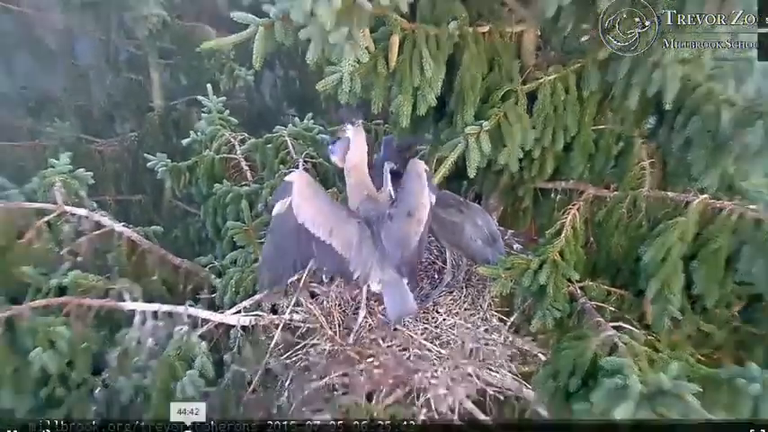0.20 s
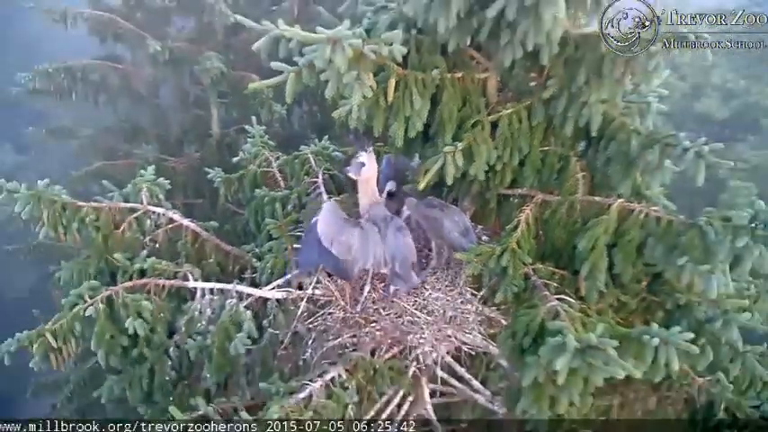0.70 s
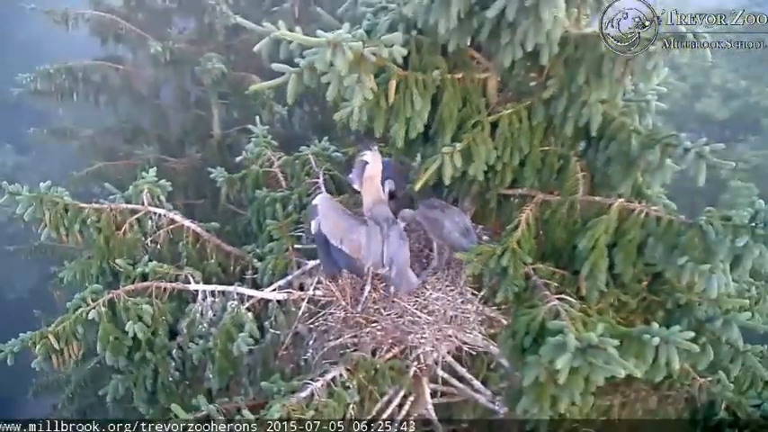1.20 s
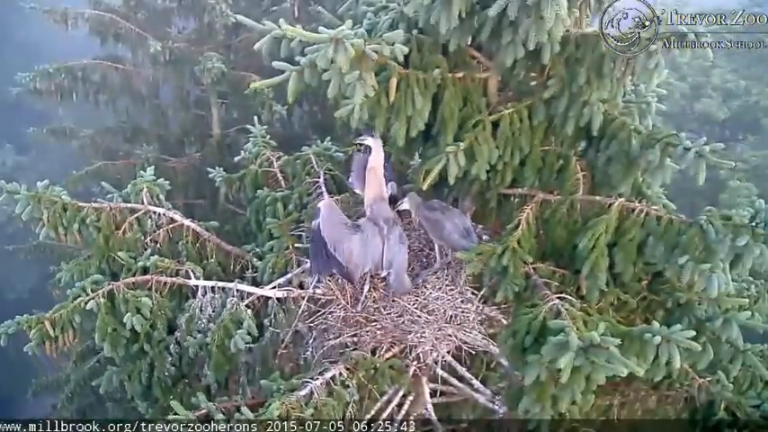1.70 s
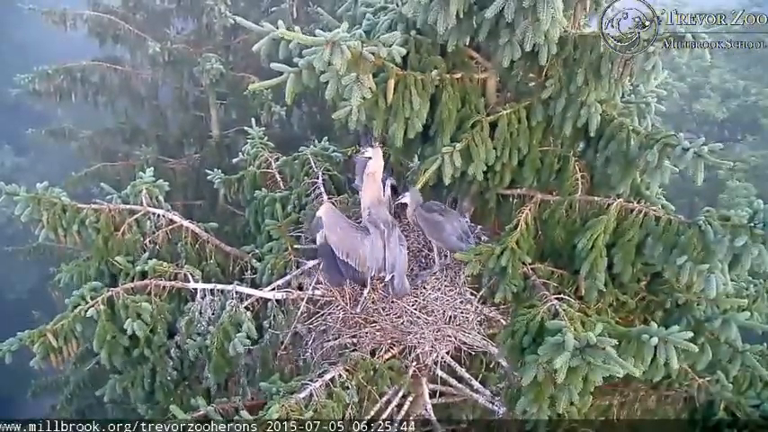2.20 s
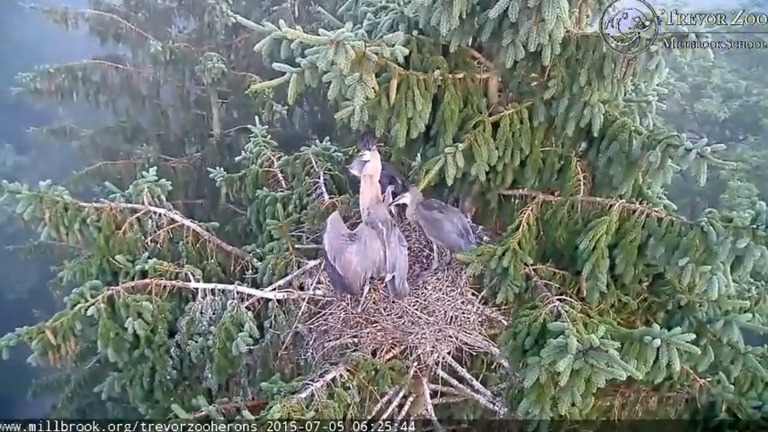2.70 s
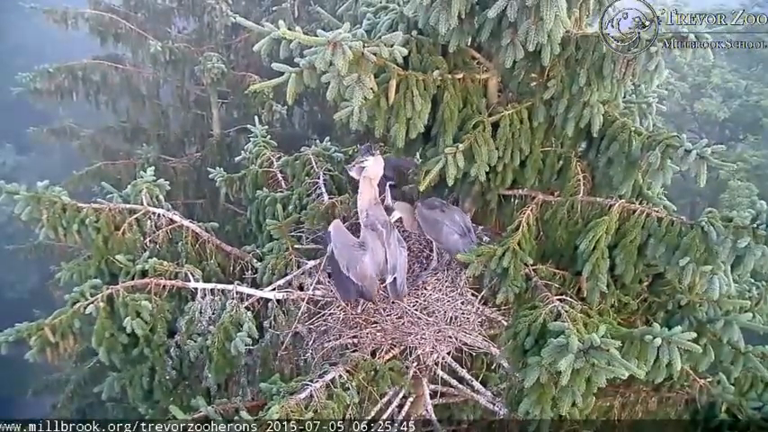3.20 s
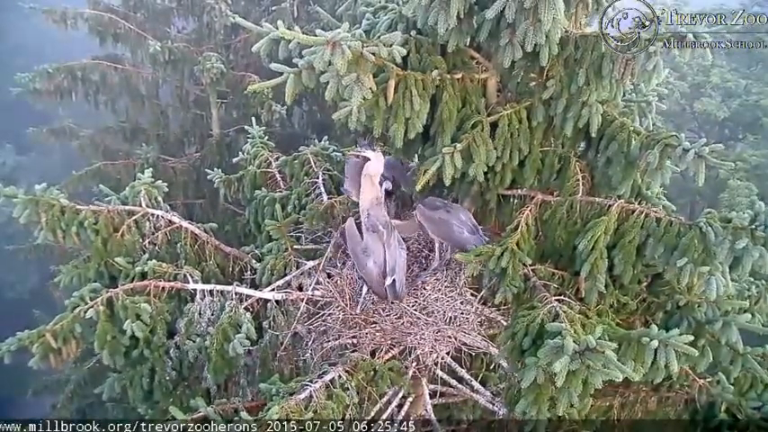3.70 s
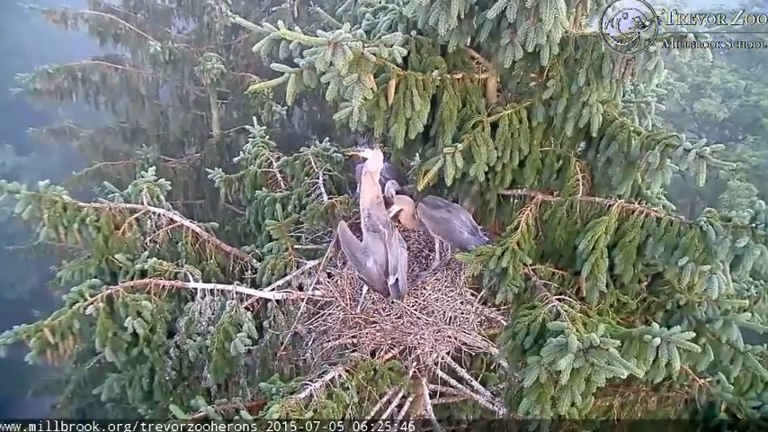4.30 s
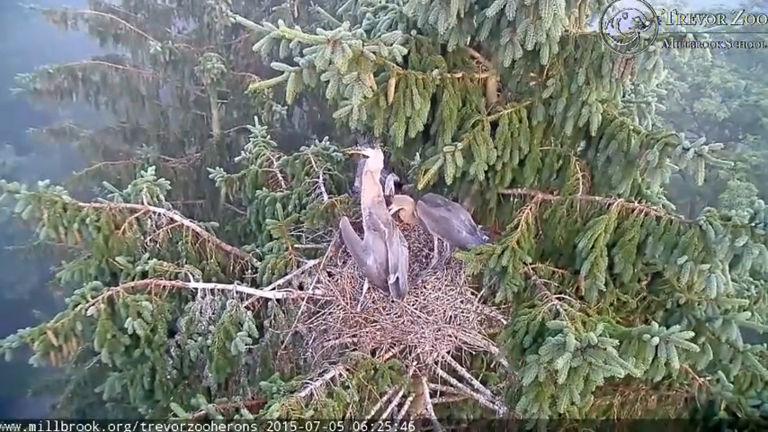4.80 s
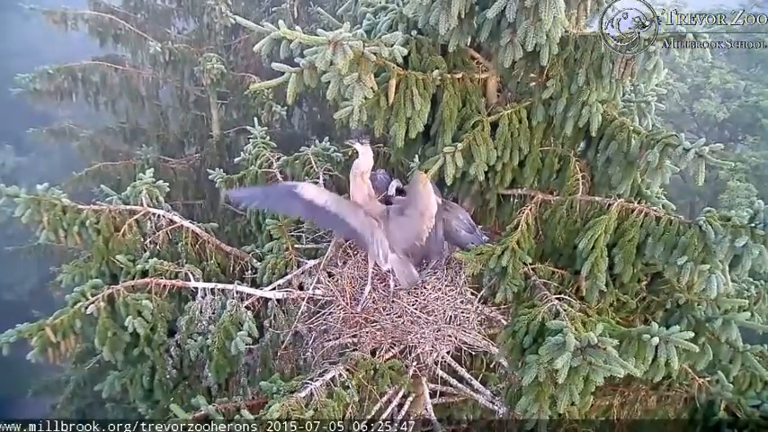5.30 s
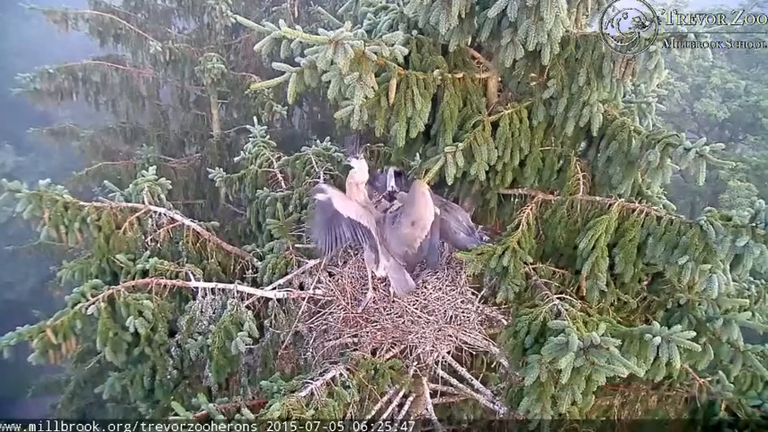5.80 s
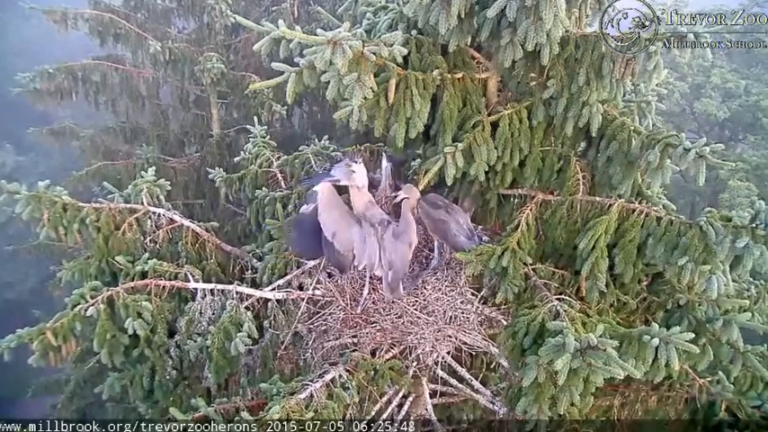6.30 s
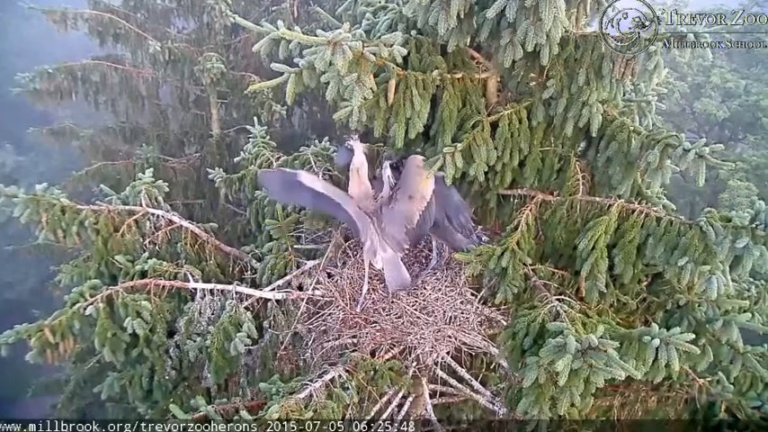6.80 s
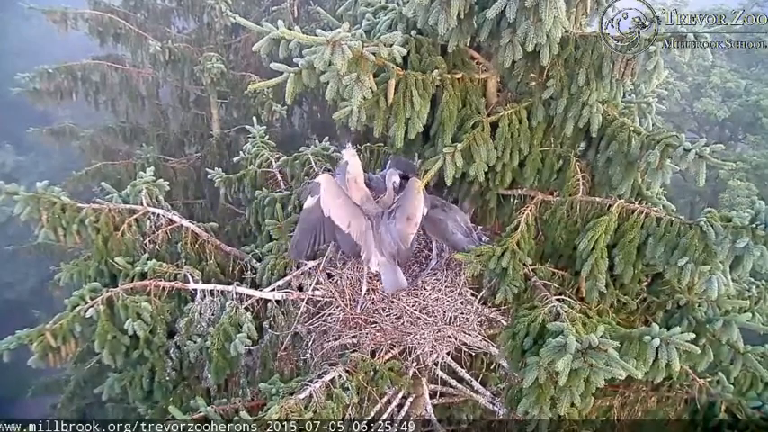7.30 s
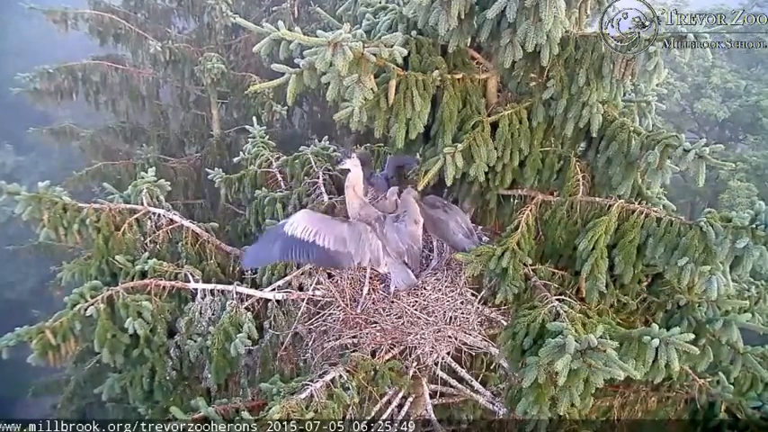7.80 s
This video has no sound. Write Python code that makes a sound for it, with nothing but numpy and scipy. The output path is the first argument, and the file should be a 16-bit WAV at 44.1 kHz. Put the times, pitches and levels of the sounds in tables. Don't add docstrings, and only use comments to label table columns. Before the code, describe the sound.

From 0 s, young herons on a treetop stick nest give harsh, throaty begging clacks, each a burst of rapid pulses about a tenth of a second long, hollow and nasal with a bright edge. After a few scattered calls, from 0.6 s they run in a steady train, about seven a second, strongest near 1.3-1.7 s. Feet thump dully, twigs tick and needles rustle. At 2.7 s the clacks stop; hoarse sibling rasping and soft woodland air remain, with a faint falling songbird whistle around 3.2 s. The second bout runs from 3.75 to about 6.1 s, with clear glides and low groans, peaking near 5 s. After a thin gap, the third starts at 6.6 s with the loudest, abrupt clack, under a far high peep, and continues strongly to 8 s. Short tree echo, low hum, microphone hiss, faint high whine and clipped-off gaps throughout.

```python
import sys
import numpy as np
from scipy import signal
from scipy.fft import rfft, irfft, next_fast_len
from scipy.io import wavfile
from scipy.ndimage import uniform_filter1d, minimum_filter1d, map_coordinates

SR = 44100
rng = np.random.default_rng(int(sys.argv[2]) if len(sys.argv) > 2 else 0)


def transcribe(u):
    v = np.clip(np.atleast_2d(u).T, -1, 1)
    q = np.round(v * 32767).astype(np.int16)
    wavfile.write(sys.argv[1], SR, q)


def rack_gain(trim_db):
    fader = np.asarray(trim_db, float)
    return 10 ** (fader / 20)


N = 356328


def unit(x):
    return x / np.sqrt(np.mean(x ** 2) + 1e-20)


def along(points, hz):
    f, v = np.transpose(points)
    return np.interp(np.log(hz + 1), np.log(f + 1), v)


def at(s, rows):
    return np.interp(s, *np.transpose(rows))


def curves(rows):
    s, *cols = np.transpose(rows)
    return [np.interp(np.arange(N) / SR, s, c) for c in cols]


def wobble(rate):
    knots = rng.standard_normal(int(N * rate / SR) + 4)
    return map_coordinates(knots, [np.arange(N) * rate / SR])


def noise(spectrum):
    m = next_fast_len(N)
    white = rfft(rng.standard_normal(m))
    return unit(irfft(white * rack_gain(along(spectrum, np.fft.rfftfreq(m, 1 / SR))), m)[:N])


def sine(hz):
    return np.sin(2 * np.pi * np.cumsum(hz) / SR)


def add(track, s, x):
    part = track[max(round(s * SR), 0):][:len(x)]
    part += x[:len(part)]


def resonances(modes, f):
    def one(c, w):
        return 1j * f * w / (c * c - f * f + 1j * f * w)
    return sum((-1) ** k * rack_gain(db) * one(c, w) * one(c, 3 * w) for k, (c, w, db) in enumerate(sorted(modes)))


# pitch in Hz, width in Hz, level in dB.
STILL_THROAT = [(498, 118, -18.5), (1277, 600, -23.5), (4070, 760, -16.5), (5270, 490, -27.5)]
# time in seconds, chest resonance in Hz (the neck stretches),
# bill resonance in dB (the head turns to the microphone), windpipe tone in dB.
POSE = [(0, 1030, -0.5, -28), (.07, 980, -14, -23), (.26, 950, -30, -25), (.36, 990, -8, -24),
        (.6, 1100, 0, -17), (.73, 1066, 2.5, -16), (.87, 1000, -1, -17), (1.0, 950, -4, -10.5),
        (1.17, 944, -6, -16), (1.31, 984, -2, -17), (1.45, 1010, -2, -18.5), (1.6, 1034, -1.5, -18.5),
        (1.75, 936, -1, -15.5), (1.9, 940, -5.5, -13), (2.07, 875, -4.5, -15), (2.24, 870, -13, -17),
        (2.38, 774, -1, -13), (2.44, 790, -12, -14), (2.54, 765, -2, -11), (2.61, 1080, -20, -10.5),
        (3.75, 854, 1, -29), (3.9, 865, 4, -27), (4.06, 850, 1.5, -30), (4.22, 760, 2, -15),
        (4.38, 810, -3, -21), (4.52, 870, -2, -15), (4.7, 805, -0.5, -15), (4.83, 780, -3, -14),
        (4.99, 800, -5, -11.5), (5.11, 764, -7.5, -10), (5.28, 775, -4.5, -17.5), (5.46, 780, -1.5, -3.5),
        (5.52, 830, 2.5, -19), (5.65, 825, -2.5, -4), (5.89, 790, -3.5, -20), (6.04, 800, -10, -9),
        (6.25, 870, -7, -28), (6.35, 930, -10.5, -40), (6.55, 895, -5, -38), (6.62, 830, -4, -31),
        (6.66, 925, -7.5, -15.5), (6.75, 850, -17, -17.5), (6.9, 850, -2.5, -39), (7.03, 935, -2.5, -21),
        (7.2, 875, 2.5, -20), (7.35, 1000, -5, -22), (7.5, 1016, -7, -15), (7.66, 975, -5, -18),
        (7.8, 954, -5.5, -14.5), (7.95, 1010, -3.5, -26)]
# time in seconds, leak from 0 up.
LEAK = [(0, .15), (.55, .35), (1.0, .4), (1.17, .5), (1.45, .25), (1.6, .4), (2.24, .3), (2.44, .7),
        (2.54, .3), (2.61, .9), (3.9, .25), (4.06, .03), (4.7, .1), (4.83, .3), (4.99, .1), (5.11, .3),
        (5.28, .15), (5.46, .1), (5.52, .5), (5.65, .15), (5.9, .2), (6.05, .03), (6.35, 1.2), (6.66, .1),
        (6.75, .6), (7.05, .5), (7.2, .04), (7.36, .6), (7.5, .8), (7.66, .1), (7.8, .05)]
# time in seconds, pitch in Hz.
BILL = [(0, 3480), (.36, 3300), (.6, 3420), (.75, 3530), (.87, 3490), (1.0, 3520), (1.2, 3670),
        (1.31, 3540), (1.45, 3550), (1.6, 3520), (1.75, 3590), (1.95, 3800), (2.07, 3700), (2.24, 3600),
        (2.4, 3400), (2.54, 3330), (3.75, 3500), (3.9, 3570), (4.06, 3400), (4.22, 3520), (4.38, 3650),
        (4.52, 3660), (4.7, 3760), (4.83, 3777), (4.99, 3730), (5.11, 3600), (5.28, 3500), (5.46, 3370),
        (5.52, 3450), (5.65, 3520), (5.89, 3380), (6.35, 3440), (6.66, 3280), (6.9, 3640), (7.03, 3420),
        (7.2, 3510), (7.35, 3540), (7.5, 3480), (7.66, 3520), (7.8, 3500), (7.95, 3560)]
# time in seconds, treble in dB.
AIM = [(0, -7), (.25, -8), (.6, 2), (.73, 4), (.87, 3.5), (1.0, 0), (1.17, 3), (1.31, 1), (1.45, -3),
       (1.6, -4), (1.75, 1), (1.9, -2), (2.07, -1), (2.24, -4), (2.38, 2), (2.54, -3), (3.75, -3),
       (3.9, -1), (4.06, -2), (4.22, -6), (4.38, 1), (4.52, 3.5), (4.7, 4.5), (4.83, 7), (4.99, 0),
       (5.11, 0), (5.28, -1), (5.46, 0), (5.52, -2), (5.65, 3.5), (5.89, -3), (6.35, -12), (6.66, 3.5),
       (6.9, -3), (7.03, -1), (7.2, -2), (7.35, 3), (7.5, 0), (7.66, 0), (7.8, -1.5), (7.95, -1)]


def voicing(s, db, rise, gape_hz, aside):
    usual_db, usual_gape_hz = -25, 2550
    times, *pose = np.transpose(POSE)
    chest_hz, bill_db, neck_db = (np.interp(s, times, column) for column in pose)
    effort_db = db - usual_db
    frenzy = np.exp(-((s - .65) / .3) ** 2)
    snap = np.exp(-rise / 0.0035)

    fall = max(205 + 6.5 * effort_db + 3 * s, 60) * (1 - 0.46 * frenzy)
    leak = at(s, LEAK) + 0.42 * frenzy
    flutter_hz, click_share = 200 + 170 * frenzy, .55 + .4 * frenzy

    chest_db = -8 - 0.25 * effort_db - 0.03 * (chest_hz - 900) - 10 * aside - 1.5 * snap
    edge_db = -47 - 0.4 * effort_db + 0.09 * bill_db - 35 * aside + 14.5 * snap - 4 * frenzy + at(s, AIM)
    bill_hz = at(s, BILL) + 0.16 * (gape_hz - usual_gape_hz)
    throat = [(chest_hz + 206 * snap, 300, chest_db),
              (0.711 * gape_hz, 480, neck_db + 7.5 * snap),
              (gape_hz, 300 + 150 * frenzy - 110 * aside, 0),
              (bill_hz, 380 + 180 * frenzy, bill_db)] + STILL_THROAT
    return fall, leak, flutter_hz, click_share, throat, edge_db


# start in seconds, peak in dB,
# pulses per second, rise in seconds, resonance of the open gape in Hz.
CLACKS = [(0.0, -28.5, 92, 0.0028, 2400), (.071, -32.5, 75, 0.024, 2790), (.247, -33, 70, 0.0044, 2240),
          (.599, -30, 102, 0.015, 2430), (.732, -26, 77, 0.015, 2420), (.874, -26, 76, 0.016, 2480),
          (1.001, -29.5, 57, 0.034, 2490), (1.166, -24, 101, 0.024, 2500),
          (1.312, -20, 101, 0.022, 2440), (1.45, -18.5, 71, 0.03, 2440),
          (1.601, -19.5, 94, 0.023, 2440), (1.751, -27, 78, 0.031, 2550),
          (1.9, -25.5, 120, 0.039, 2670), (2.075, -27, 96, 0.02, 2680),
          (2.238, -28.5, 98, 0.0086, 2724), (2.382, -32.5, 108, 0.019, 2730),
          (2.539, -29, 71, 0.01, 2850), (2.608, -40, 89, 0.0077, 2040),
          (3.755, -32.5, 90.1, 0.037, 2470), (3.9, -30, 81.5, 0.032, 2160),
               (4.063, -24.5, 70.1, 0.018, 2210), (4.221, -28.5, 87.1, 0.0091, 2533),
               (4.381, -23, 70.2, 0.023, 2540), (4.52, -23, 73.7, 0.034, 2480),
               (4.695, -27.5, 64.05, 0.011, 2690), (4.825, -31, 87.7, 0.027, 2640),
               (4.982, -23.5, 103, 0.0074, 2880), (4.996, -17.5, 76.6, 0.0039, 2950),
               (5.113, -27, 97.1, 0.0346, 2870), (5.276, -26.5, 80.3, 0.013, 3200),
               (5.299, -22, 86.9, 0.0018, 2960), (5.459, -34, 82.5, 0.018, 2180),
               (5.521, -28, 99.6, 0.0016, 2560), (5.651, -28.5, 84.7, 0.0083, 2270),
               (5.89, -30.5, 71.9, 0.013, 2120), (6.251, -44.5, 80.5, 0.018, 2550),
          (6.621, -34.5, 79, 0.015, 2210), (6.662, -8.5, 166, 0.0025, 2540),
              (6.895, -30.5, 105.4, 0.03, 2560), (7.028, -26, 84.2, 0.037, 2650),
              (7.201, -23, 77.3, 0.018, 2690), (7.34, -28, 67.5, 0.032, 2800),
              (7.353, -21, 93.1, 0.0074, 2420), (7.497, -25.5, 115.6, 0.012, 2570),
              (7.659, -18.5, 72.5, 0.02, 2650), (7.807, -20, 80.25, 0.026, 2670),
              (7.957, -18, 76.4, 0.032, 2690)]
# start in seconds, peak in dB, pulses per second,
# rise in seconds, gape resonance in Hz.
SIBLING = [
    (0.357, -36.5, 59, 0.0044, 3170),
    (0.537, -39, 69, 0.0016, 2300),
    (0.678, -41.5, 123, .0024, 2730),
    (2.437, -34.5, 87, 0.013, 2300),
    (6.35, -35, 58, 0.021, 2410),
    (6.75, -25, 83, 0.018, 2620),
]
# start in seconds, peak in
# dB, pulses per second, rise in seconds, gape resonance in Hz.
MORE_SIBLING = [
    (.553, -43.5, 84, 0.017, 2030),
    (.822, -39, 54, 0.00092, 2970),
    (5.723, -40, 77, .004, 3400),
    (5.808, -40, 80, 0.0078, 3200),
    (6.043, -38, 68, .008, 2540),
]
# time in seconds, hold in seconds.
HOLD = [(0, 0.02), (.25, 0.036), (.536, 0.0089), (.553, 0.029), (.6, 0.05), (.73, 0.033), (.822, 0.0043),
        (.87, 0.038), (1.0, 0.057), (1.17, 0.037), (1.31, 0.039), (1.45, 0.04), (1.6, 0.036), (1.75, 0.037),
        (1.9, 0.028), (2.07, 0.032), (2.24, 0.036), (2.38, 0.019), (2.44, 0.055), (2.54, 0.03),
        (2.61, 0.041), (3.75, 0.038), (3.9, 0.027), (4.06, 0.03), (4.22, .045), (4.38, 0.036),
        (4.52, 0.034), (4.7, 0.035), (4.83, 0.027), (4.984, 0.0075), (4.993, 0.029), (5.11, 0.036),
        (5.28, 0.034), (5.46, 0.023), (5.52, 0.022), (5.65, 0.041), (5.89, 0.045), (6.04, 0.047),
        (6.25, 0.044), (6.35, 0.057), (6.62, 0.027), (6.66, 0.028), (6.75, 0.037), (6.9, 0.037),
        (7.03, 0.034), (7.2, 0.036), (7.35, 0.035), (7.5, 0.04), (7.66, 0.041), (7.8, 0.037), (7.95, 0.023)]
# pitch in Hz, level in dB.
BILL_EDGE = [(3500, -31.5), (4600, 15), (5500, 7.5), (6500, 3.5), (7800, -7.5), (9000, -8), (12000, -23),
             (15000, -29)]


def clacks():
    out, m = np.zeros(N), 1 << 13
    t, f = np.arange(m) / SR, np.fft.rfftfreq(m, 1 / SR)
    soft = (1 - (f / 4600) ** 2 + 1.4j * f / 4600) ** -2
    turned_away = np.transpose(SIBLING + MORE_SIBLING)[0]
    for s, db, rate, rise, gape_hz in sorted(CLACKS + SIBLING) + MORE_SIBLING:
        luck, air = rng.standard_normal((3, 40)), rng.standard_normal((3, m))
        fall, leak, beat, share, throat, edge_db = voicing(s, db, rise, gape_hz, aside=s in turned_away)

        drift = np.cumsum((.01 + .06 * leak) * luck[0]) * np.arange(40) / 4
        cycle = t * rate + np.interp(t * rate, np.arange(40), drift)
        turn, phase = np.clip(cycle.astype(int), 0, 39), cycle % 1
        pulse = np.exp(-(phase / .45) ** 2.3) * np.minimum(.6 + phase / .06, 1)
        opening = rack_gain(1.5 * luck[1][turn]) * pulse + leak + 1.2 * t

        flutter = np.floor(phase / rate * beat * np.exp(.18 * luck[2][turn]))
        struck = np.diff(flutter + 50 * turn, prepend=-1) != 0
        clicks = struck * rack_gain(0.86 * air[2]) * np.sqrt(SR / beat)

        climbed = (0.7 * t + 0.5 * (turn + 0.33) / rate) / rise
        short_db = (5.0 + 418 * rise) * np.maximum(1 - climbed, 0) ** 1.45
        if np.min(np.abs(np.transpose(SHUT)[1] - s)) < .006:
            short_db = np.minimum(short_db, 9.5)
        late = np.maximum(t - rise, 0)
        cut = rack_gain(-fall * 0.046 * (late / at(s, HOLD)) ** 2.23)
        effort = rack_gain(-short_db) * (cut + rack_gain(-18.0 - 78 * late)) * (t < .16)

        source = effort * opening * (share * clicks + (1.12 - share) * air[0])
        voice = rfft(source) * resonances(throat, f) * soft
        patches_db = 3 * np.interp(f / 600, np.arange(40), luck[2])
        edge = rfft(effort * opening * (air[1] + 0.64 * clicks))
        hiss = edge * rack_gain(edge_db + patches_db + along(BILL_EDGE, f))
        add(out, s, rack_gain(db + 17.0) * irfft(voice + hiss, m)[:m * 15 // 16])
    return out


# time in seconds, level in dB.
WHEEZE = [(0.0, -48.5), (.46, -48.5), (1.2, -48.5), (1.9, -50), (2.5, -49), (2.75, -54.5), (3.6, -54.5),
          (3.91, -47.5), (4.4, -50.5), (4.98, -45.5), (5.4, -48), (5.6, -49), (5.96, -50), (6.2, -47),
          (6.5, -50), (6.81, -49), (8.08, -51)]
# pitch in Hz, level in dB.
HOARSE_LOW = [(150, -14.5), (300, -11.5), (420, -6.5), (550, -1.5), (1000, -3), (1060, 0), (1170, -39),
              (2500, -46.5)]
HOARSE_MID = [(900, 8), (1150, 16.5), (1900, 21.5), (2400, -31)]
HOARSE_HIGH = [(1800, -18.5), (2300, -7), (2600, -5.5), (3500, -9), (4300, -19.5), (6000, -33.5),
               (9000, -82)]


def wheeze(open_gain):
    chest_db, = curves(WHEEZE)
    gape_db = -45 + (chest_db + 48.5)
    neck_db = -40.5 + 0.56 * curves(POSE)[2]
    throb = unit(rack_gain(2.7 * np.clip(wobble(170), -3, 2) + .6 * wobble(20)))
    dull = rack_gain(chest_db) * noise(HOARSE_LOW) + rack_gain(neck_db) * noise(HOARSE_MID)
    bright = rack_gain(gape_db) * noise(HOARSE_HIGH)
    return throb * (open_gain * dull + open_gain ** 0.15 * bright)


# time in seconds, pitch in Hz, level in dB.
WHISTLES = [
    [(3.145, 3160, -54), (3.183, 3360, -49), (3.2, 2930, -41), (3.213, 2930, -43), (3.228, 2670, -56)],
    [(3.248, 2980, -42.5), (3.258, 2860, -45), (3.268, 2420, -51), (3.303, 2280, -52.5), (3.39, 2260, -54),
     (3.41, 2250, -60)],
]
# time in seconds, pitch in Hz, level in dB.
GLIDES = [
    [(4.9, 3080, -48), (4.915, 3000, -43), (4.935, 2820, -43), (4.96, 2520, -45), (4.976, 2200, -50)],
    [(4.337, 3200, -50), (4.35, 3130, -44), (4.38, 2990, -44), (4.4, 2940, -48)],
    [(3.732, 3150, -50), (3.75, 3200, -44), (3.778, 3270, -44)],
    [(2.6, 2063, -50), (2.62, 1920, -48), (2.68, 1990, -49), (2.71, 1960, -49)],
    [(5.225, 4750, -56), (5.245, 4250, -46), (5.27, 3800, -42), (5.3, 3450, -36), (5.345, 3300, -37),
     (5.37, 3150, -48), (5.5, 3040, -50)],
]
# time in seconds, pitch in Hz, level in dB.
PEEP = [
    [(6.8, 5270, -60), (6.84, 5120, -46), (6.9, 5035, -44), (6.96, 5070, -42), (7.0, 5230, -53.5),
     (7.04, 5160, -65)],
]


def whistles():
    out, t = np.zeros(N), np.arange(N) / SR
    for note in WHISTLES + GLIDES + PEEP:
        hz, db = curves(note)
        ends = np.clip(np.minimum(t - note[0][0], note[-1][0] - t) / 0.0023, 0, 1)
        out += ends * rack_gain(db + 3.0) * sine(hz)
    return out


# start in seconds, length in seconds, first pitch in Hz, last pitch in Hz,
# level in dB.
NOTES = [
    (2.55, 0.094, 2050, 2100, -45),
    (2.61, .06, 1300, 1400, -47),
    (3.848, .06, 2400, 2200, -44),
    (4.255, .045, 3600, 3450, -41),
    (3.98, .03, 3550, 3500, -43),
    (6.385, 0.055, 2440, 2760, -39),
    (5.555, .03, 5100, 4860, -55),
    (0.13, .07, 1400, 1480, -57),
    (6.349, 0.12, 1030, 940, -47),
    (6.36, 0.085, 3350, 3550, -44),
]


def wavering_notes():
    out = np.zeros(N)
    song = [(.03 + k * .1148, .055, 6900, 3900, -57) for k in range(5)]
    for s, length, from_hz, to_hz, db in song + NOTES:
        u = np.arange(round(length * SR)) / (length * SR)
        glide = to_hz + (from_hz - to_hz) * (1 - u) ** (1 + 14 * length)
        hz = glide + .012 * from_hz * wobble(250)[:len(u)]
        level = rack_gain(db + 2.2 * wobble(112)[:len(u)]) * np.sqrt(np.sin(np.pi * u))
        add(out, s, level * sine(hz))
    return out


# time in seconds, level in dB, pitch in Hz.
THUMPS = [(0.463, -38, 103), (0.586, -34, 140), (.662, -32, 165), (1.101, -34, 155.8), (1.148, -36, 148.7),
          (2.06, -39.5, 157.7), (2.221, -31.5, 380), (2.222, -48, 120), (2.799, -41, 220),
          (2.806, -38.5, 416), (3.681, -36.5, 410), (6.544, -42.5, 106.5)]


def thumps():
    out, t = np.zeros(N), np.arange(SR // 10) / SR
    for s, db, hz in THUMPS:
        push = rack_gain(db + 4.5 - 6.3 * hz * t) * (1 - np.exp(-t * hz))
        add(out, s, push * np.sin(2 * np.pi * hz * t * (1 + 6 * t)))
    return out


# time in seconds, level in dB.
TWIGS = [
    (.4404, -58),
    (.465, -61),
    (2.2184, -58),
    (2.2822, -57),
    (7.1048, -57),
]
# pitch in Hz, level in dB.
TWIG_SNAP = [(2000, -30), (4000, 0), (10000, -3), (15000, -10)]


def twig_ticks():
    level, t = np.zeros(N), np.arange(SR // 50) / SR
    for s, db in TWIGS:
        add(level, s, rack_gain(db - 60 * t / .03))
    return level * noise(TWIG_SNAP)


# time in seconds, level in dB.
RUSTLE = [(0.0, -49), (.02, -52), (.035, -43), (.086, -44), (.1, -54), (.3, -51), (.375, -44), (.392, -53),
          (.45, -50), (.7, -49.5), (2.3, -57.5), (3.51, -63), (5.04, -53), (6.3, -51), (8.08, -68)]
# pitch in Hz, level in dB.
NEEDLES = [(4000, -19.5), (6000, -5), (8000, -9.5), (10000, -12.5), (13000, -16.5), (15400, -19)]


def rustle():
    return rack_gain(curves(RUSTLE)[0] - 19.5 + wobble(27)) * noise(NEEDLES)


# pitch in Hz, time to fade by 60 dB in seconds.
NEAR_TREES = [(300, 0.19), (3000, 0.3), (5000, 0.062), (8000, 0.0074)]
FAR_TREES = [(2000, .9), (5000, 1.3)]


def trees(x, decays):
    out, step = np.zeros(N), SR // 2
    for a in range(0, N, step):
        hz, t, z = signal.stft(rng.standard_normal(SR // 2), SR, nperseg=256)
        fade = rack_gain(-60 * t / along(decays, hz)[:, None])
        tail = signal.istft(z * fade, SR, nperseg=256)[1]
        add(out, a / SR + .012, signal.fftconvolve(x[a:a + step], tail / np.linalg.norm(tail)))
    return out


# pitch in Hz, level in dB per Hz.
AIR = [(12, -67), (20, -11.5), (112, -4), (153, -17.5), (209, -8), (236, -16), (938, -25), (1280, -16),
       (2250, -18), (2600, -7.5), (3500, -8), (6500, -41), (8450, -83), (14300, -120)]


def wood_air():
    air = rack_gain(-48.5 + 0.2 * wobble(12.0) + 1.2 * wobble(30)) * noise(AIR)
    traffic = noise([(85, -26.5), (97, -0.5), (105, 14.0), (112, -16.0), (125, -69.0)])
    return air + rack_gain(-65.5 + 1.9 * wobble(25)) * traffic


# time in seconds, pitch in Hz.
WHINE = [(0.0, 11000), (0.54, 10720), (4.7, 10980), (4.93, 10830), (6.91, 10950), (7.25, 10800),
         (8.08, 10700)]


def electronics():
    hiss = rack_gain(-72.0) * noise([(5000, -21), (6500, -2.0), (9000, -6.5), (12000, -9), (14700, -6), (15400, -7)])
    hz = curves(WHINE)[0] + 70 * wobble(9) + 45 * wobble(90)
    return hiss + rack_gain(-72.5 + 0.95 * wobble(60)) * sine(hz)


# from seconds, to seconds.
SHUT = [(.115, .246), (1.145, 1.16), (1.735, 1.755), (2.71, 3.677), (4.03, 4.059), (4.19, 4.22),
        (4.35, 4.381), (4.655, 4.686), (4.805, 4.826), (4.942, 4.97), (5.092, 5.108), (5.405, 5.458),
        (5.595, 5.65), (5.858, 5.889), (6.125, 6.252), (6.56, 6.62), (6.875, 6.892), (7.15, 7.199),
        (7.32, 7.336), (7.46, 7.495), (7.62, 7.657), (7.78, 7.804), (7.932, 7.954)]


def gate():
    corners = []
    for a, b in SHUT:
        corners += [(a - .007, 1), (a + .007, .03), (b - .002, .03), (b, 1)]
    return curves(corners)[0]


def starved(x):
    hz, _, z = signal.stft(x, SR, nperseg=2048)
    power = np.abs(z) ** 2
    total = uniform_filter1d(power.sum(1, keepdims=True), size=9, axis=2)
    loud_db = 10 * np.log10(np.abs(total) + 1e-12)
    tilt_db = 3 * np.log2(hz / 12000 + 0.00089)[:, None]
    limit_db = -107 + .55 * (loud_db + 36.0) + tilt_db
    local_db = 10 * np.log10(np.abs(uniform_filter1d(power, size=7, axis=1)) + 1e-20)
    keep = 1 / (1 + np.exp(np.clip(2 * (limit_db - local_db), -30, 30)))
    return signal.istft(z * np.where(hz[:, None] > 5000, keep, 1), SR, nperseg=2048)[1][:, :N]


def scene():
    chicks, open_gain = clacks(), gate()
    birds = whistles() + wavering_notes()
    nest = open_gain * (chicks + rack_gain(-15) * trees(chicks, NEAR_TREES)) + wheeze(open_gain)
    far = birds + rack_gain(-11) * trees(birds, FAR_TREES)
    feet = thumps() + twig_ticks()
    return (nest + far + feet + rustle() + wood_air() + electronics())[None]


def top_cut(x):
    return signal.sosfilt(signal.butter(12, 15760, fs=SR, output="sos"), x)


def record(dry):
    top_hz = 15450
    need = np.minimum(1, .44 / (np.abs(dry) + 1e-9))
    held = dry * uniform_filter1d(minimum_filter1d(need, size=181), size=89)
    m = next_fast_len(N)
    band = irfft(rfft(held, m) * (np.fft.rfftfreq(m, 1 / SR) < top_hz), m)[:, :N]
    mix = starved(band)
    return top_cut(mix)


dry = scene()
out = record(dry)
transcribe(out)
```